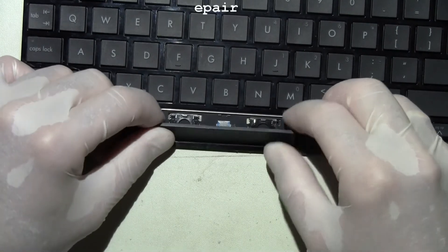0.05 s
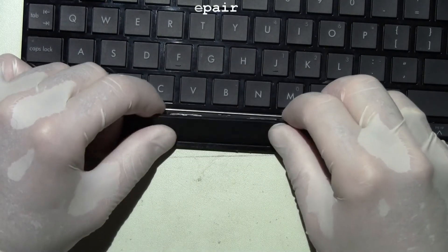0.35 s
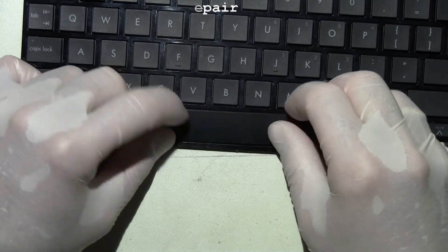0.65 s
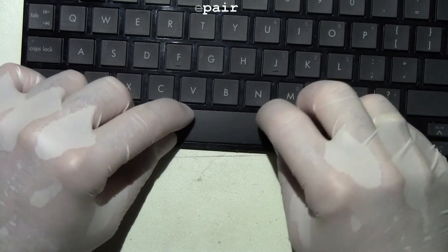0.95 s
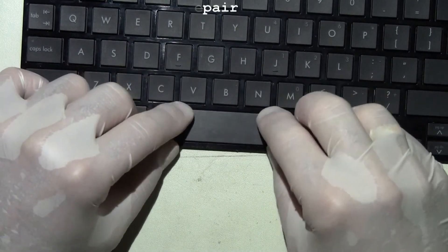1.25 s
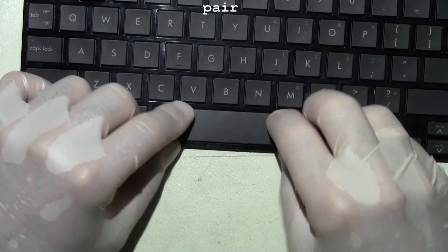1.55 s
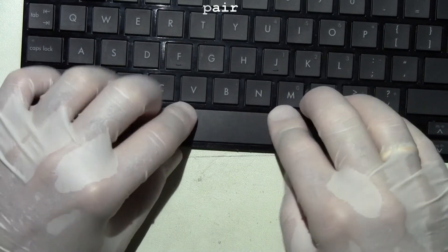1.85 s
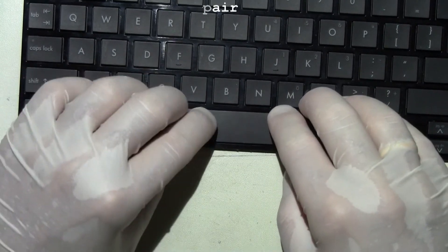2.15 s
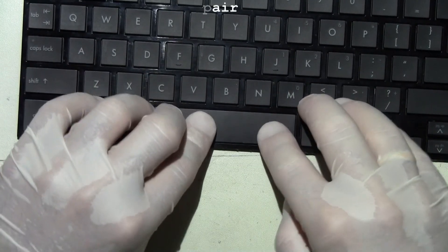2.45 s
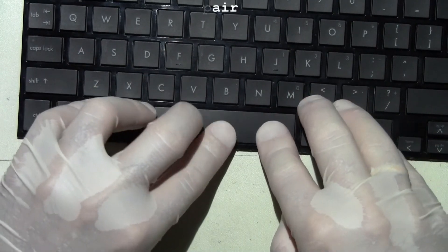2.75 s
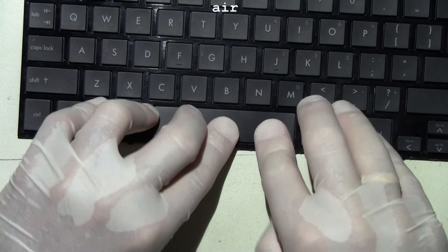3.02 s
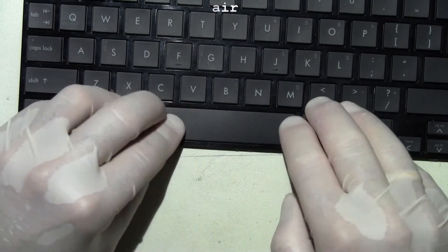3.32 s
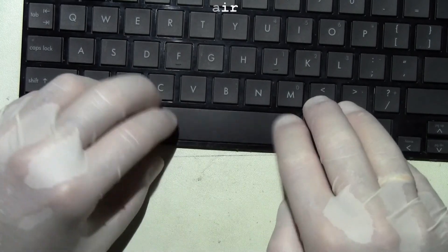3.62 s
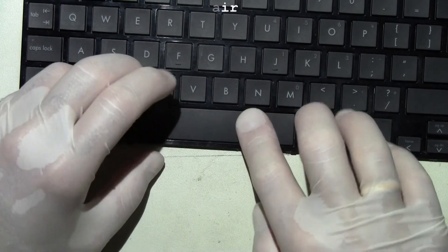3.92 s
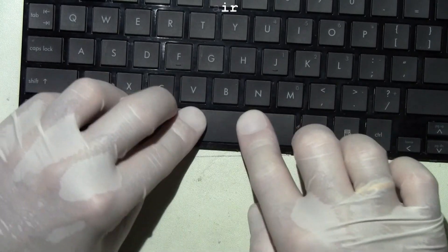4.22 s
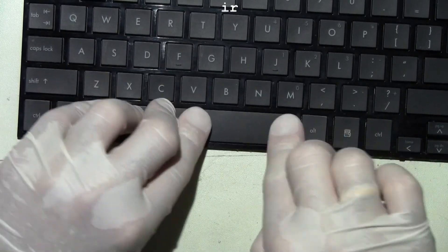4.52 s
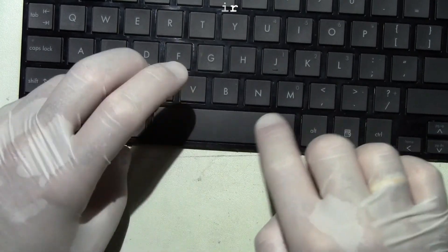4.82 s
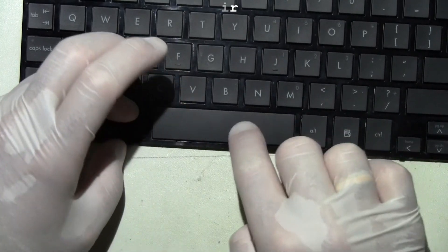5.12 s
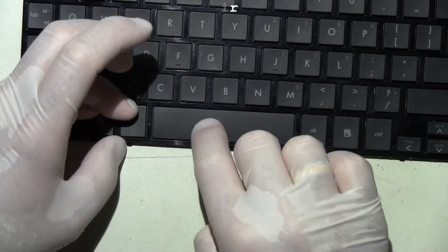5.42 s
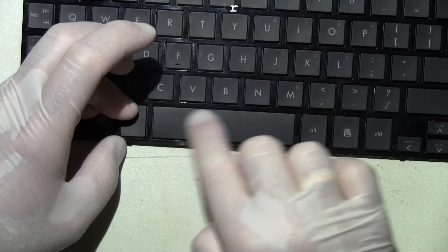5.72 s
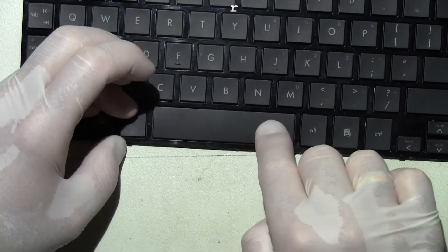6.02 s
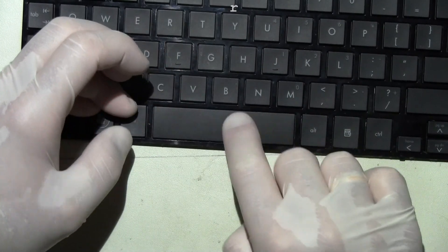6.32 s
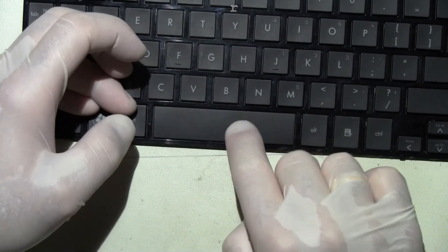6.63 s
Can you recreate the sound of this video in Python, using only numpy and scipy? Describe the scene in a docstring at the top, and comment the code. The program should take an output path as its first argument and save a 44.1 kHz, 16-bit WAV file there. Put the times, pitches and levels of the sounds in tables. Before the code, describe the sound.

Close to the microphone, gloved fingers fit a plastic space bar onto a laptop. For the first second and a half there are only light ticks and small clicks. A sharp double snap comes at about 1.7 seconds as a clip catches, with more at 2.9 and 3.4 seconds and the loudest at 4.1. The snaps thud softly in the case and briefly ring the metal plate under the keys. Between them, fingers tick on the keycap and rubber gloves rub faintly. From about 5 to 6.7 seconds the bar is tapped nine times, slightly unevenly and more quietly than the snaps. Each tap has a thin plastic rattle, a soft thud and a lighter click as the key springs back. The small room adds a short echo, and faint ventilation noise and mains hum continue throughout.

```python
"""Refitting a laptop's space bar

Close to the microphone, on a desk in a small room, gloved hands press the bar onto its hinges until
the clips snap home, then tap it nine times. The loose plastic rattles as the finger lands and lifts;
snaps and taps ring the metal plate under the keys and thud through the case. Rubber rubs on the keys,
the room rings briefly, and ventilation and a faint mains hum lie behind."""
import sys
import numpy as np
from scipy import signal
from scipy.fft import rfft, irfft
from scipy.io import wavfile
from scipy.ndimage import uniform_filter1d

SR = 44100
rng = np.random.default_rng(int(sys.argv[2]) if len(sys.argv) > 2 else 0)


def store_pcm(level_fs):
    """Save levels as 16-bit WAV."""
    pcm = np.round(np.clip(level_fs, -1, 1) * 32767).astype(np.int16)
    wavfile.write(sys.argv[1], SR, np.atleast_2d(pcm).T)


N = 302967
SIZE = 4096  # samples in one contact
T = np.arange(SIZE) / SR
HZ = np.fft.rfftfreq(SIZE, 1 / SR)


def amp(db):
    """Decibels to gain."""
    return 10 ** (np.asarray(db) / 20)


def unit_rms(x, count=None):
    """Scales to rms 1, taken over the first count samples or over all."""
    return x / np.sqrt(np.mean(x[..., :count] ** 2) + 1e-20)


def curve(points, hz):
    """Joins (Hz, value) points on a log-frequency axis."""
    f, value = np.transpose(points)
    return np.interp(np.log(hz + 1), np.log(f + 1), value)


def add(mix, s, sound):
    """Mixes a stereo sound in at s seconds."""
    part = mix[:, max(round(s * SR), 0):][:, :sound.shape[1]]
    part += sound[:, :part.shape[1]]


def causal(db):
    """Frequency response with this gain that rings only after the blow."""
    log_gain = np.log(amp(np.maximum(db, -100)))
    mirrored = np.r_[log_gain, log_gain[-2:0:-1]]
    return np.exp(np.conj(signal.hilbert(mirrored)))[:len(db)]


# Room tone. Each row: frequency in Hz, relative noise density in dB.
AIR_SPECTRUM = [(15, -58.5), (25, -36.5), (64, -23.5), (114, -15), (145, -14), (170, -12), (384, -5),
                (416, -5), (531, -6), (840, -9.5), (936, -9.5), (1040, -11.5), (1700, -17), (2110, -20),
                (16000, -45)]
# Its image at the microphone. Each row: frequency in Hz, left-right correlation from -1 to 1.
AIR_CORRELATION = [(60, 0.68), (150, 0.41), (380, -0.719), (950, -0.553), (2380, -0.076), (5980, 0.047),
                   (15000, 0.22)]

def room_tone(air_db=-52.5, hum_hz=116.6, hum_db=-70.5):
    """Steady ventilation noise and mains hum behind the laptop."""
    hz = np.fft.rfftfreq(N, 1 / SR)
    left, other = rfft(rng.standard_normal((2, N)))
    same = np.clip(curve(AIR_CORRELATION, hz), -1, 1)
    right = same * left + np.sqrt(1 - same ** 2) * other
    noise = irfft(np.array([left, right]) * amp(curve(AIR_SPECTRUM, hz)), N)
    hum = np.sqrt(2) * np.sin(2 * np.pi * hum_hz * np.arange(N) / SR)
    return amp(air_db) * unit_rms(noise) + amp(hum_db) * hum


def contact(decay_ms, crack, crack_ms=0.5, ring_db=-19, ring_s=0.01892, rise_s=.0001, smooth_bins=90):
    """Spectrum of one contact: a first crack, then dense plastic modes dying within milliseconds."""
    ms = T * 1000
    envelope = np.exp(-ms / max(decay_ms, .3)) + crack * np.exp(-ms / crack_ms)
    envelope += amp(ring_db) * np.exp(-T / ring_s)
    spectrum = rfft(envelope * (1 - np.exp(-T / rise_s)) * rng.standard_normal(SIZE))
    # narrow peaks and notches change from blow to blow, the broad colour does not
    broad_db = 10 * np.log10(uniform_filter1d(abs(spectrum) ** 2, smooth_bins))
    return spectrum * causal(-broad_db)


# Thin plastic struck at close range. Each row: frequency in Hz, gain in dB.
PLASTIC_COLOUR = [(60, -29.5), (250, -3.5), (600, -3), (1000, -3.5), (1500, 0.5), (2200, -4), (3300, 0.5),
                  (4300, 0), (5200, -1.5), (7000, 0), (11000, -6), (12500, -13.5), (14000, -20.5),
                  (16000, -33.5)]
# Stereo width of a blow at the microphone. Each row: frequency in Hz, side against mid in dB.
BLOW_WIDTH = [(100, -23.5), (400, -12.5), (700, -20), (1400, -31.5), (3000, -35), (5500, -16.5), (9000, -9),
              (13000, -1)]

def blow(rooms, level_db, decay_ms, colour_db, resonance_db, crack, room_resonance=0.17):
    """A knock on plastic, reaching the microphone's two ports slightly differently, and its echo."""
    broad_db = curve(PLASTIC_COLOUR, HZ) + colour_db
    body = causal(broad_db + resonance_db)
    mid = irfft(body * contact(decay_ms, crack))
    side = irfft(body * amp(curve(BLOW_WIDTH, HZ)) * contact(decay_ms, 0))
    direct = amp(level_db) * unit_rms(np.array([mid + side, mid - side]), count=220)
    # the room gathers sound from all directions, which smooths out peaks and notches
    radiated = irfft(causal(broad_db + room_resonance * resonance_db))
    radiated *= np.linalg.norm(direct[0]) / np.linalg.norm(radiated)
    sound = signal.fftconvolve(radiated[None], rooms[rng.integers(len(rooms))])
    sound[:, :SIZE] += direct
    return sound


def touch_colour(bright_db):
    """A soft fingertip gives a dull contact, a hard edge a thin one."""
    return curve([(1300, -4 - bright_db), (4000, 0.0075), (9000, bright_db)], HZ)


# Faint touches near the microphone. Each row: start in seconds, level before trim in dB,
# brightness in dB.
TOUCHES = [(0.03, -52, 6), (0.1084, -53.5, 13), (0.3124, -54, -3), (0.3349, -54.5, -1.5),
           (0.3966, -51, 2.5), (1.0183, -46.5, 4), (1.0264, -47.5, -3), (1.0503, -41.5, -3),
           (1.0997, -44.5, 7.5), (1.446, -42, -2.5), (1.5558, -55, -6), (1.7623, -49, 9.5),
           (1.7897, -47.5, 5), (1.9009, -43, 1.5), (1.994, -49, 5.5), (2.16, -53, 0.5), (2.6413, -50, 10.5),
           (2.6953, -49, -4.5), (2.9544, -42, -5.5), (3.0993, -51.5, 17.5), (3.1816, -44.5, 9.5),
           (3.2081, -42, 4), (3.25, -42, 3.5), (3.2589, -43, -1), (3.5944, -41.5, -2.5), (3.848, -38.5, 0),
           (4.3383, -53, 6.5), (4.4487, -49.5, 6), (4.6284, -50.5, -3.5), (4.7726, -48.5, 14),
           (4.795, -41.5, 5), (4.8493, -52.5, 7), (5.0187, -46.5, 5.5), (5.0588, -46.5, -14),
           (5.192, -46, 3), (6.802, -45.5, 1), (6.842, -47.5, -13)]

def touches(rooms, decay_ms=2.5, trim_db=-0.5):
    """Fingers and keycap meet lightly in small, short ticks."""
    out = np.zeros((2, N))
    for s, level_db, bright_db in TOUCHES:
        add(out, s, blow(rooms, level_db + trim_db, decay_ms, touch_colour(bright_db), 0, crack=1.2))
    return out


# The small room's decay. Each row: frequency in Hz, time to fall 60 dB in seconds.
ECHO_T60 = [(150, 0.01), (700, 0.6154), (2000, 0.6483), (5000, 0.5185), (8000, 0.5219), (11000, 0.72),
            (15000, 0.27)]
# The tone of its echo. Each row: frequency in Hz, relative level in dB.
ECHO_COLOUR = [(100, -15.5), (500, 9), (1100, 2), (1900, 2), (2800, -4), (5200, -2.5), (7500, -4.5),
               (11000, -15.5), (13000, -15.5), (15000, -8)]

def room(wet_db=-18.0, early_db=4, early_s=0.047, gap_s=0.0018, side_db=-6):
    """The room's response: a diffuse tail, stronger at first from the desk and near walls."""
    hz, t, bands = signal.stft(rng.standard_normal((2, SR * 3 // 4)), SR, nperseg=256)
    bands *= amp(curve(ECHO_COLOUR, hz)[:, None] - 60 * t / curve(ECHO_T60, hz)[:, None])
    mid, side = signal.istft(bands, SR, nperseg=256)[1]
    t = np.arange(len(mid)) / SR
    tail = np.array([mid + amp(side_db) * side, mid - amp(side_db) * side])
    tail *= np.clip(t / gap_s - .5, 0, 1) * amp(early_db * np.exp(-t / early_s))
    return amp(wet_db) * tail / np.linalg.norm(tail[0])


def struck(colour, hz, peak_db, width_hz, body_db, treble_db):
    """Colour and main resonance of a blow: the place struck adds body or treble and favours one pitch."""
    place_db = curve([(1700, body_db), (4200, 0.0031), (5600, 0), (8500, treble_db)], HZ)
    resonance_db = peak_db / (1 + ((HZ - hz) / width_hz) ** 2)
    return curve(colour, HZ) + place_db, resonance_db


def hardness(level_db, hard_db=-20):
    """Harder blows start with a sharper crack."""
    return np.sqrt(amp(level_db - hard_db))


# The keycap on its hinges and clips, close up. Each row: start in seconds, level before trim in dB,
# main resonance and its half-width in Hz, then in dB body, treble, feed to the plate, thud in the case,
# and bounce on the feet against that thud.
CLIP_SNAPS = [(0.5777, -32, 1533, 100, -0.5, 2, 3, -51.5, -22),
              (0.7063, -32.5, 10600, 1500, -2, -1.5, -3, -44.5, -12),
              (0.9867, -32, 3300, 200.7, 1, -8, -0.5, -62, -14),
              (1.4355, -33.5, 5300, 353.5, -9.5, -8, 0.5, -70, -15),
              (1.667, -16, 5130, 402, -4, 1.5, 2, -45, -7),
              (1.6972, -20.5, 5300, 451.6, -5, -6.5, 1, -36, -19.5),
              (1.8696, -36, 7270, 400.4, -1.5, 1, 1, -62, -14.5),
              (1.8882, -33, 7730, 400, 0, 4.5, -1, -51, -18),
              (2.304, -38, 1465, 149.3, -2, -7.5, 3, -48.5, -7),
              (2.6408, -47.5, 8000, 901, -6.5, 2, 0, -62.5, 4),
              (2.8837, -21, 2150, 300, 1, 0.5, 7, -46, -9.5),
              (2.8919, -15.5, 2032, 300, -1.5, -3.5, 4, -58.5, -17.5),
              (3.4276, -16.5, 1800, 250, -4.5, -6.5, 4, -40.5, -19),
              (3.4398, -16, 672, 150.3, -1, -2.5, 2.5, -53.5, -21.5),
              (3.6932, -38, 4250, 200, -9.5, -1, -6.5, -59, -10),
              (3.8386, -39.5, 5630, 503, -11.5, 4.5, 1, -74, -13.5),
              (3.843, -36, 4926, 400, -4, 3, -2, -40, -26.5),
              (4.0758, -12.5, 3300, 1100, 0, 2.5, -12, -48, -8),
              (4.7902, -35.5, 4230, 300, -9.5, -1, 0, -57.5, -3.5),
              (4.8229, -38, 8230, 404, -7.5, 1, -2, -68, -14)]
# A snap's tone on top of the plastic's own. Each row: frequency in Hz, gain in dB.
CLIP_COLOUR = [(200, -9), (600, -0.5), (1000, -6.5), (1500, 0.5), (2200, -3), (3200, 0), (5200, 1),
               (8000, -1), (11500, 3.5)]

def snaps(rooms, linger=0.2, decay_ms=2.4, crack=1.9, trim_db=0.5):
    """The keycap snaps into its clips, ringing the plate and thudding the case. Returns cap and case."""
    cap, into_plate, case = np.zeros((3, 2, N))
    for s, level_db, hz, width_hz, body_db, treble_db, plate_db, thud_db, bounce_db in CLIP_SNAPS:
        tone = struck(CLIP_COLOUR, hz, peak_db=7.5, width_hz=width_hz,
                      body_db=body_db, treble_db=treble_db)
        hard = hardness(level_db)
        ring_ms = decay_ms / hard ** linger  # gentle knocks linger a little longer
        sound = blow(rooms, level_db + trim_db, ring_ms, *tone, crack * hard)
        add(cap, s, sound)
        add(into_plate, s, amp(plate_db) * sound)
        add(case, s, thud(thud_db, pitch_hz=334, bounce_db=bounce_db, knock_db=-8, focus_db=7))
    return cap + plate(into_plate), case


# The metal plate under the keys. Each row: mode in Hz, gain in dB, time to fall 60 dB in seconds.
PLATE_MODES = [(1144, -4.5, 0.017), (1413, -1, 0.05), (1760, -6, 0.3), (2167, -4, 0.034), (2340, -4.5, .08),
               (4874, -17, 0.12), (5242, -4.5, 0.048)]

def plate(cap):
    """The plate rings briefly in sympathy with the keycap."""
    hz, db, t60 = np.transpose(PLATE_MODES)[:, :, None]
    t = np.arange(2 * SIZE) / SR
    damping = np.log(1000) / t60
    modes = amp(db) * 2 * damping / SR * np.exp(-damping * t) * np.cos(2 * np.pi * hz * t)
    return signal.oaconvolve(cap, modes.sum(0)[None], axes=1)[:, :N]


# The case on the desk. Each row: mode in Hz, relative level in dB, time to fall 60 dB in seconds.
CASE_MODES = [(79, -9, 0.091), (92.51, -5, 0.38), (178, -7.5, 0.12), (241.3, -6, 0.19), (288.6, 0.5, 0.082),
              (328.66, 1, 0.073), (395.6, -1.5, 0.071), (517.6, 4, 0.06), (656.3, -4, 0.096),
              (766.5, -10, 0.09)]

def thud(level_db, pitch_hz, bounce_db, knock_db, focus_db, focus_octaves=0.18, rise_s=0.0018):
    """A push rings the case: a deep bounce on its feet, the panel modes, and a harder knock."""
    hz, db, t60 = np.transpose(CASE_MODES)[:, :, None]
    t = np.arange(2 * SIZE) / SR
    family = np.digitize(hz[:, 0], [140, 450])  # bounce, panel, knock
    # the place of the push favours the modes near one pitch
    favour_db = focus_db * np.exp(-(np.log2(hz / pitch_hz) / focus_octaves) ** 2)
    detune, phase, scatter_db = rng.standard_normal((3, len(hz), 1)) * [[[.02]], [[.6]], [[1.5]]]
    # higher modes radiate less evenly, so they reach the microphone's ports out of step
    port_phase = np.array([.1, -.1])[:, None, None] * np.minimum(hz / 340, 1) ** 2
    envelope = amp(db + favour_db + scatter_db - 60 * t / t60) * (1 - np.exp(-t / rise_s))
    modes = envelope * np.sin(2 * np.pi * hz * (1 + detune) * t + phase + port_phase)
    return sum(amp(level_db + family_db) * unit_rms(modes[:, family == k].sum(1), count=1764)
               for k, family_db in enumerate([bounce_db, 0, knock_db]))


# Gloves on the keys, close up. Each row: start and length in seconds, level and brightness in dB.
GLOVE_RUBS = [(0.998, 0.14, -62.5, -3), (1.506, 0.36, -68.5, 0), (2.091, 0.073, -66, 2),
              (2.614, 0.109, -64.5, -3), (2.865, 0.0159, -44, -20.5), (3.134, 0.118, -55.5, 1),
              (3.301, 0.0563, -60.5, -7), (3.942, 0.048, -64.5, 7.5), (4.366, 0.0423, -63, 1),
              (4.561, 0.137, -62.5, -5.5), (4.713, 0.116, -59.5, 1), (6.384, 0.061, -57, -2.5),
              (6.734, 0.129, -56, -7.5)]

def gloves(slips_per_s=2500, slip_spread_db=6.5):
    """Rubber slips over the keys in tiny jerks, each a small contact on plastic."""
    out = np.zeros((2, N))
    for s, length, level_db, bright_db in GLOVE_RUBS:
        n = int(length * SR)
        colour = causal(curve(PLASTIC_COLOUR, HZ) + touch_colour(bright_db))
        slips = (rng.random(SR) < slips_per_s / SR) * rng.standard_normal(SR)
        slips *= amp(slip_spread_db * np.minimum(rng.exponential(1, SR), 4))  # a few jerks crackle
        centre = irfft(colour * contact(decay_ms=0.51, crack=0.55))
        wide = irfft(colour * np.array([contact(2, 0), contact(1.8, 0)]))
        stroke = slips[:n] * signal.windows.tukey(n, .6)
        rub = signal.fftconvolve(stroke[None], centre + .3 * wide)
        add(out, s, amp(level_db) * unit_rms(rub, count=n))
    return out


# A hand on the case, dead centre. Each row: start and length in seconds, level in dB, pitch in Hz.
HAND_LEANS = [(3.94, 0.072, -56, 134), (4.108, 0.22, -63, 99.58)]

def leaning_hand(width_hz=35):
    """The hand's shifting weight rumbles the case."""
    out = np.zeros((2, N))
    for s, length, level_db, hz in HAND_LEANS:
        n = int(length * SR)
        band = 1 / (1 + ((np.fft.rfftfreq(SR, 1 / SR) - hz) / width_hz) ** 4)
        rumble = irfft(rfft(rng.standard_normal(SR)) * band)[:n] * np.hanning(n)
        add(out, s, amp(level_db) * unit_rms(np.array([rumble, rumble])))
    return out


# Taps on the bar, close up, levels before trim. Each row: time it hits bottom in seconds, then in dB
# level, body, treble, thud and finger landing, then time of the lift in seconds and its level in dB.
BAR_TAPS = [(4.96, -32.5, -5, 0.5, -46.5, -32, 5.0289, -33.5),
            (5.1406, -30.5, -5.5, 3.5, -45.5, -33.5, 5.203, -35.5),
            (5.3121, -23.5, 2, 1.5, -39.5, -32.5, 5.5365, -40), (5.646, -23, -1, -3, -43, -37, 5.7148, -33),
            (5.8288, -27.5, -0.5, 0.5, -43.5, -34.5, 5.8847, -37),
            (5.997, -25.5, -4, -5.5, -38.5, -27.5, 6.2484, -33.5),
            (6.3468, -27, -0.5, -3.5, -44.5, -32, 6.4164, -30.5),
            (6.522, -27.5, 3, 1.5, -45, -36.5, 6.5794, -32),
            (6.679, -28, -4.5, 2.5, -41.5, -32, 6.732, -44.5)]
# The tone of the bar hitting bottom. Each row: frequency in Hz, gain in dB.
BAR_BOTTOM_COLOUR = [(800, -4.5), (1500, -1), (2200, 0), (3200, 0.5), (5200, 0), (8000, -3.5),
                     (11500, -0.5)]
# The tone of its rattle. Each row: frequency in Hz, gain in dB.
BAR_RATTLE_COLOUR = [(800, -12.5), (1500, -14.5), (2200, -6.5), (3200, 0.5), (5200, 2), (8000, 1.5),
                     (11500, 5)]

def taps(rooms, firm_db=-24.5, firm_travel_s=0.0044, firm_decay_ms=2.14, db_per_doubling=11,
         landing_ms=8.8, lift_ms=2.37, rebound_s=0.004,
         trim_db=0.3359, landing_trim_db=-4.5, lift_trim_db=-1, rebound_db=-7):
    """The loose bar chatters under the finger, hits bottom and springs back. Returns cap and case."""
    cap, case = np.zeros((2, 2, N))
    landing = struck(BAR_RATTLE_COLOUR, hz=5120, peak_db=12, width_hz=300, body_db=5.5, treble_db=5.5)
    lift = struck(BAR_RATTLE_COLOUR, hz=4550, peak_db=3, width_hz=830, body_db=0.5, treble_db=1.5)
    for s, level_db, body_db, treble_db, thud_db, landing_db, lift_s, lift_db in BAR_TAPS:
        # softer taps travel and die away more slowly
        slowness = 2 ** ((firm_db - level_db) / db_per_doubling)
        landing_s = s - firm_travel_s * slowness
        add(cap, landing_s, blow(rooms, landing_db + landing_trim_db, landing_ms, *landing, crack=0))
        bottom = struck(BAR_BOTTOM_COLOUR, hz=3053, peak_db=7, width_hz=149,
                        body_db=body_db, treble_db=treble_db)
        crack = 0.95 * hardness(level_db)
        add(cap, s, blow(rooms, level_db + trim_db, firm_decay_ms * slowness, *bottom, crack))
        add(case, s, thud(thud_db, pitch_hz=312.6, bounce_db=-12, knock_db=-11, focus_db=8))
        # the released bar strikes its wire twice
        add(cap, lift_s, blow(rooms, lift_db + lift_trim_db, lift_ms, *lift, crack=0.3))
        add(cap, lift_s + rebound_s, blow(rooms, lift_db + rebound_db, lift_ms, *lift, crack=0.3))
        add(case, lift_s, thud(lift_db - 20, pitch_hz=265.5, bounce_db=-18, knock_db=-24, focus_db=10))
    return cap, case


def scene(case_wet_db=-2):
    """Keycap, case and hands close to the microphone, a touch left of centre, with the room behind."""
    rooms = [room() for _ in range(8)]  # the moving hands change the echoes from blow to blow
    cap, tap_thuds = taps(rooms)
    cap += touches(rooms)
    snap_cap, snap_thuds = snaps(rooms)
    cap += plate(cap) + snap_cap
    low_cut = signal.butter(3, 62, "high", fs=SR, output="sos")  # the thuds carry no deep bass
    case = signal.sosfilt(low_cut, tap_thuds + snap_thuds) * amp([[.6], [-.6]])
    case += gloves() + leaning_hand()
    case += amp(case_wet_db) * signal.fftconvolve(case, rooms[0], axes=1)[:, :N]
    return cap * amp([[.25], [-.25]]) + case + room_tone() * amp([[.4], [-.4]])


def record(dry, ceiling=0.9, edge_hz=16400):
    """The hardest snaps just overload the microphone input; then the highest treble is cut off."""
    limited = dry / (1 + (dry / ceiling) ** 8) ** (1 / 8)
    low_pass = signal.firwin(511, edge_hz, window=("kaiser", 9), fs=SR)
    return signal.oaconvolve(limited, low_pass[None], "same")


dry = scene()
out = record(dry)
store_pcm(out)
```